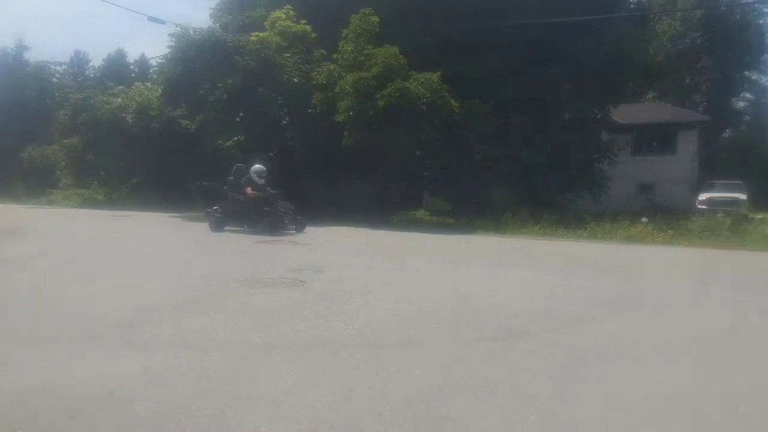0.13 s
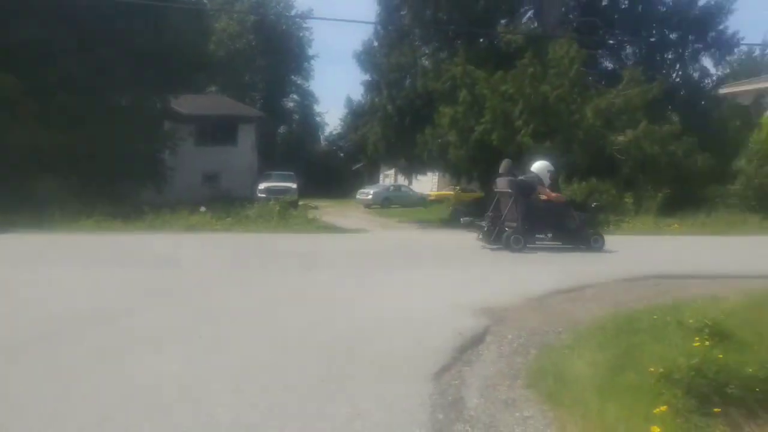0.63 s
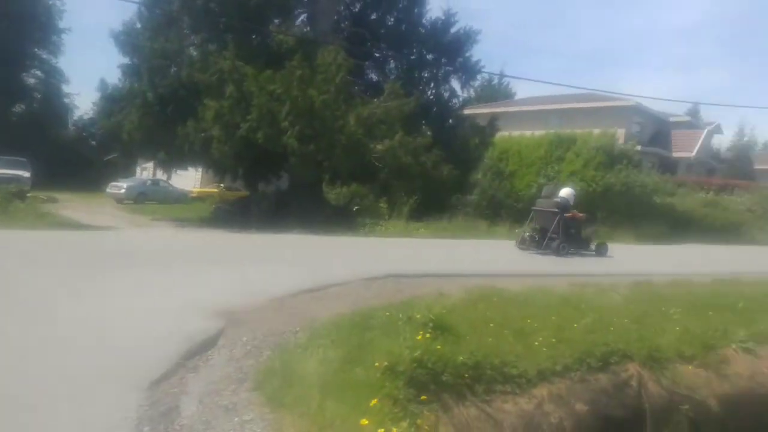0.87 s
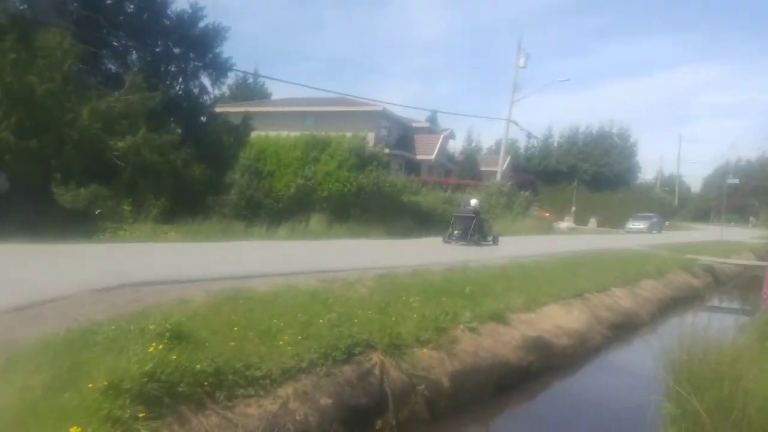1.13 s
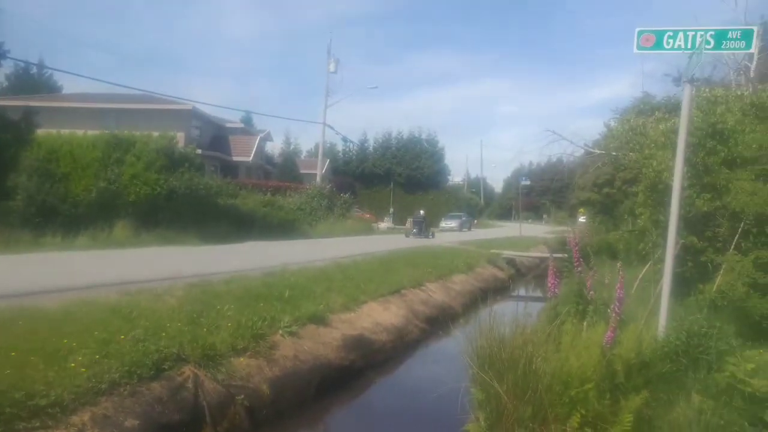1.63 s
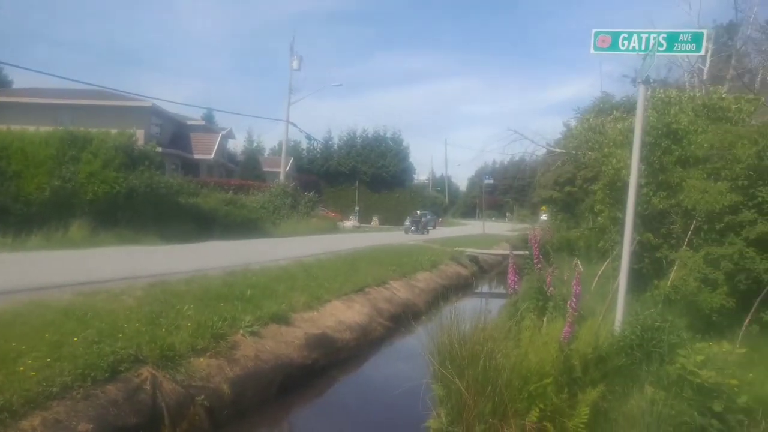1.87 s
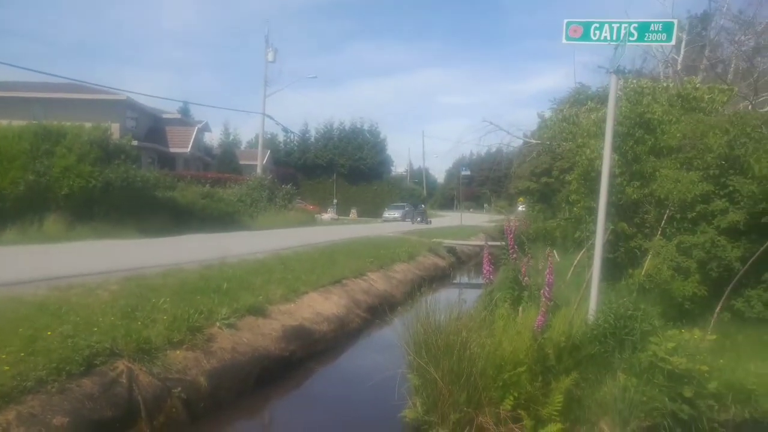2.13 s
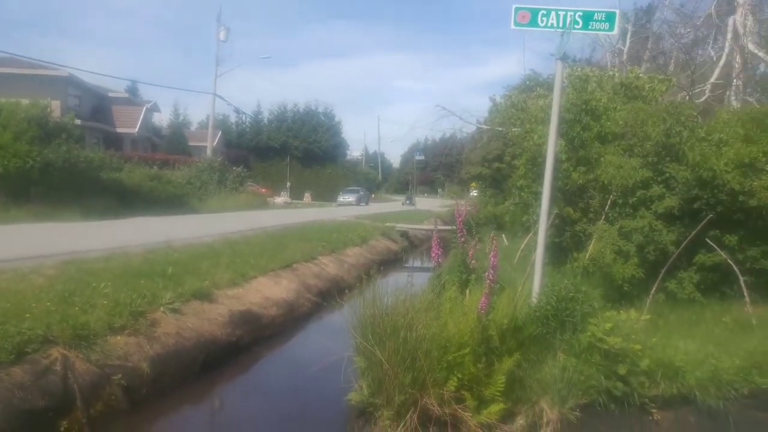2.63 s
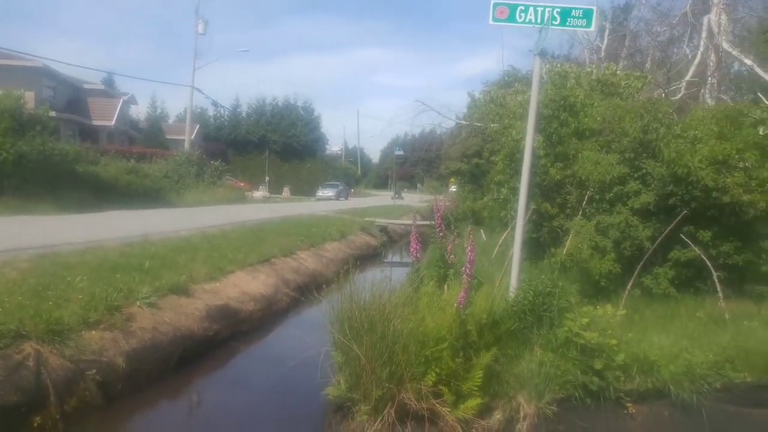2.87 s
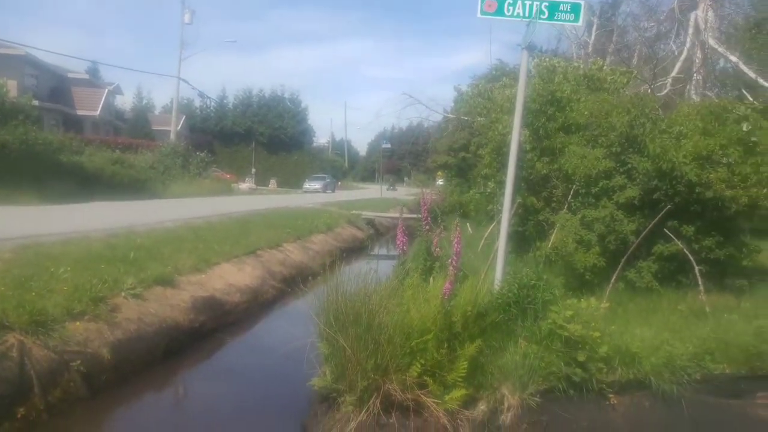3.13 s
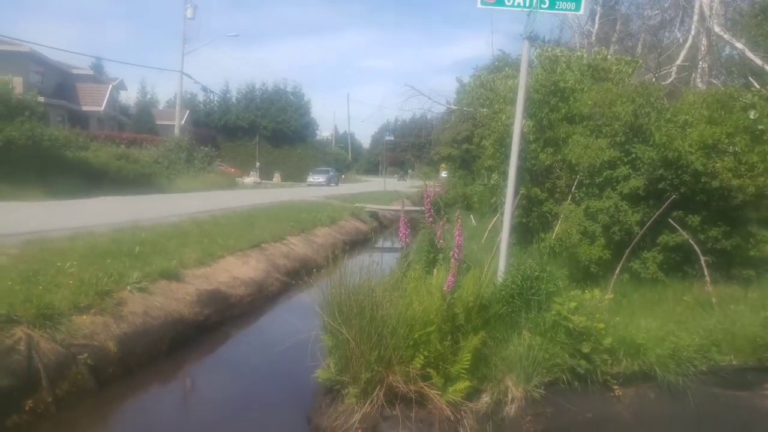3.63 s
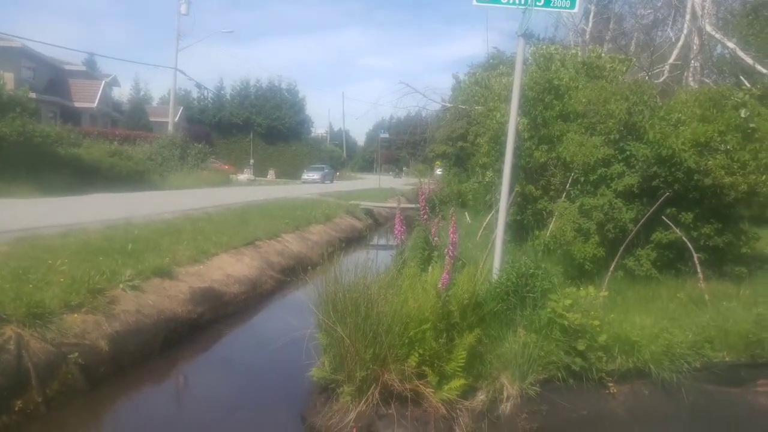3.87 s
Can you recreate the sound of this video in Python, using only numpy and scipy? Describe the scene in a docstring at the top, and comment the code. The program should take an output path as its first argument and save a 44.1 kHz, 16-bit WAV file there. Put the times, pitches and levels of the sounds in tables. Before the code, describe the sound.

A small four-stroke kart passes on an open paved road, its rapid popping exhaust and tyre hiss peaking near one second, then receding with a hollow low putter, heard from a handheld phone at the roadside.

```python
"""A single-cylinder four-stroke kart passes a hand-held phone on a paved road and drives away.
Each firing thumps and snaps in the exhaust pipe and gas cracks; half a cycle later intake and silencer ring.
Echoes return from hedges and houses, tyres and chain hiss across the phone's two microphone ports,
small ticks sound near the phone and light wind rumbles. After a silent start the sound cuts in and fades up."""
import sys
import numpy as np
from scipy import signal
from scipy.fft import rfft, irfft
from scipy.io import wavfile
from scipy.ndimage import uniform_filter1d

SR = 44100
rng = np.random.default_rng(int(sys.argv[2]) if len(sys.argv) > 2 else 0)


def to_wav(sig):
    """Store sig (one row per channel, or 1-D mono) as 16-bit WAV at the path in sys.argv[1].

    Samples outside -1..1 are clipped; the rate is SR.
    """
    pcm = np.clip(np.atleast_2d(sig), -1, 1) * 32767
    pcm = np.round(pcm).astype(np.int16)
    wavfile.write(sys.argv[1], SR, pcm.T)  # frames by channels


N = 176400


def undb(db):
    """dB to gain."""
    return 10 ** (np.asarray(db) / 20)


def unit(x):
    """Scales to rms 1."""
    return x / np.sqrt(np.mean(x ** 2))


def curve(table, index):
    """One column of a table, interpolated over time."""
    a = np.array(table)
    return np.interp(np.arange(N) / SR, a[:, 0], a[:, index])


def at(table, hz):
    """A spectrum read on a log-frequency axis."""
    a = np.array(table)
    return np.interp(np.log(hz + 1), np.log(a[:, 0]), a[:, 1])


def band(x, lo_hz, hi_hz):
    """Band-pass."""
    return signal.sosfilt(signal.butter(2, [lo_hz, hi_hz], "band", fs=SR, output="sos"), x)


def ring(x, modes):
    """Decaying resonances struck by x."""
    out = 0
    for hz, db, t60 in modes:
        pole = np.exp((2j * np.pi * hz - np.log(1000) / t60) / SR)
        out = out + undb(db) * signal.lfilter([1], [1, -pole], x).imag
    return out


def steep_ring(x, modes):
    """Each resonance passed twice, so that it swells before it decays and its skirts are steep."""
    return unit(sum(ring(ring(x, [mode]), [mode]) / mode[2] for mode in modes))


def pulses(times, sizes):
    """Clicks at exact times, each shared between two samples."""
    out, s = np.zeros(N + 2), np.clip(times * SR, 0, N)
    np.add.at(out, s.astype(int), sizes * (1 - s % 1))
    np.add.at(out, s.astype(int) + 1, sizes * (s % 1))
    return out[:N]


def fade(x, seconds):
    """Exponential tail after each click, with this time constant."""
    return signal.lfilter([1], [1, -np.exp(-1 / (seconds * SR))], x)


def walk(rate):
    """Random levels held 1 / rate seconds and smoothed twice."""
    k = int(SR / rate)
    steps = np.repeat(rng.standard_normal(N // k + 1), k)
    return 0.76 * uniform_filter1d(uniform_filter1d(steps, k), k)[:N]


def scatter(count):
    """Bounded random deviations, one per cycle."""
    return np.clip(rng.standard_normal(count), -2, 2)


# Engine speed as heard at the phone: time_s, firing_rate_hz
FIRING_RATE = [(0.34, 36.26), (0.6, 35.08), (0.8, 34.02), (1.0, 33.2), (1.3, 32.89), (1.7, 32.73),
               (2.2, 32.92), (2.8, 33.17), (3.4, 33.2), (4.0, 33.46)]
ONE_FIRING_S = 2.1973  # a moment at which the exhaust valve opens


def cycles():
    """Running count of engine cycles, whole at each firing."""
    turns = np.cumsum(curve(FIRING_RATE, index=1)) / SR
    return turns - turns[int(ONE_FIRING_S * SR)]


# Engine parts over the pass: time_s, thump_db, upper_mode_db, snap_db, intake_db, silencer_db,
# gas_crack_db, bright_crack_db
ENGINE_LEVELS = [(.35, -51, -31.5, -36, -25.5, -29, -34.5, -59),
                 (.6, -59, -32.5, -29, -26.5, -33, -44, -52), (.8, -50, -27, -27, -21, -22, -46, -32),
                 (.92, -48, -15.5, -19, -17, -17, -36, -34), (1.05, -28, -17, -29, -18, -23.5, -37, -28),
                 (1.25, -21, -26, -17, -23, -20.5, -26, -25),
                 (1.5, -18, -25, -18, -27.5, -21.5, -25.5, -20),
                 (1.7, -18.5, -26.5, -16.5, -34, -30, -32, -19),
                 (1.9, -19.5, -24.5, -16.5, -32, -29, -23.5, -27.5),
                 (2.15, -19.5, -26.5, -17, -35.5, -30, -31, -30),
                 (2.4, -18.5, -29.5, -18, -37, -34.5, -34, -34), (2.7, -18, -26, -23, -45, -32.5, -49, -33),
                 (3.0, -18.5, -26.5, -29, -33, -31.5, -41, -41),
                 (3.3, -23, -30, -25, -38.5, -44, -42.5, -51),
                 (3.6, -24, -31.5, -25.5, -35.5, -31.5, -39, -36.5),
                 (4.0, -28.5, -34, -28, -31.5, -36, -35, -28)]
JITTER_S, SCATTER_DB = .00006, 1.0  # cycle to cycle


def engine(turns):
    """Strikes all pipes from one train of firings and sets each part's level along the pass."""
    whole = np.arange(np.ceil(turns[0]), turns[-1])
    fired = np.interp(whole, turns, np.arange(N) / SR) + JITTER_S * scatter(len(whole))
    size = undb(SCATTER_DB * scatter(len(whole)))
    push = exhaust_push(fired, size)
    rush = intake_rush(turns)
    parts = [thump(push), upper_mode(push), snap(fired, size),
             intake(turns, whole, rush), silencer(turns, whole, rush)]
    direct = sum(x * undb(curve(ENGINE_LEVELS, index=k + 1)) for k, x in enumerate(parts))
    direct = direct + boom(push)
    return direct + echoes(direct) + gas_crack(fired)


THUMP_LAG_S, VALVE_S = 0.00088, 0.0012


def exhaust_push(fired, size):
    """The opening valve releases a soft pressure pulse just after the snap."""
    return fade(fade(pulses(fired + THUMP_LAG_S, size), VALVE_S / 2), VALVE_S / 2)


# Low exhaust pipe modes: pitch_hz, level_db, t60_s
THUMP_MODES = [(107, -10.5, 0.022), (138.4, -6.5, 0.051), (178.6, -3.5, 0.073)]
WAVER_DB = 4.5  # scales the random swell of each pipe mode on its way through moving air


def thump(push):
    """Low pipe modes ring against the snap's polarity, each wavering alone."""
    return -unit(sum(ring(push, [mode]) * undb(WAVER_DB * walk(3.07)) for mode in THUMP_MODES))


# Upper exhaust pipe mode: pitch_hz, level_db, t60_s
UPPER_MODE = [(221.4, 0, 0.026)]


def upper_mode(push):
    """A higher pipe mode rings and wavers faster."""
    return -unit(ring(push, UPPER_MODE)) * undb(WAVER_DB * walk(4.6))


# Sharp exhaust resonances: pitch_hz, level_db, t60_s (level and t60 of one of two passes)
SNAP_MODES = [(591.6, 5, 0.0076), (1310, -8, 0.016)]


def snap(fired, size):
    """Each firing strikes short resonances with a click."""
    return steep_ring(pulses(fired, size * undb(SCATTER_DB * scatter(len(fired)))), SNAP_MODES)


INTAKE_AT, INTAKE_OPEN = .52, 0.29  # shares of the cycle
RUSH_DB = -9  # rushing air against the struck ring


def intake_rush(turns):
    """Noise of air drawn in while the intake is open."""
    opening = np.clip((turns - INTAKE_AT) % 1 / INTAKE_OPEN, 0, 1)
    return np.sin(np.pi * opening) * rng.standard_normal(N)


def later_pulses(turns, whole, share):
    """One click per cycle, a share of the cycle after the firing."""
    times = np.interp(whole + share, turns, np.arange(N) / SR)
    return pulses(times + .00008 * scatter(len(whole)), undb(1.0 * scatter(len(whole))))


# Intake resonances: pitch_hz, level_db, t60_s (level and t60 of one pass; the click passes twice)
INTAKE_MODES = [(516.5, 0, 0.054), (969, -3.5, 0.032), (1412, -8.5, 0.043)]
APPROACH_RAISE = 1.08  # pitch ratio while the kart draws near
PASSED_HZ, NEARING_HZ = 33, 36.3  # heard firing rates


def intake(turns, whole, rush):
    """Suction rings the intake, higher while the kart draws near, and air rushes through it."""
    suck = later_pulses(turns, whole, INTAKE_AT)
    near = np.clip((curve(FIRING_RATE, index=1) - PASSED_HZ) / (NEARING_HZ - PASSED_HZ), 0, 1)
    raised = [(hz * APPROACH_RAISE, db, t60) for hz, db, t60 in INTAKE_MODES]
    struck = np.sqrt(1 - near) * steep_ring(suck, INTAKE_MODES) + np.sqrt(near) * steep_ring(suck, raised)
    return struck + undb(RUSH_DB) * unit(ring(rush, INTAKE_MODES))


# Silencer resonances: pitch_hz, level_db, t60_s (level and t60 of one pass; the click passes twice)
SILENCER_MODES = [(627.7, -1.5, 0.045), (466, -6.5, 0.055)]
SILENCER_AT = .55  # share of the cycle


def silencer(turns, whole, rush):
    """The silencer rings just after the intake, with the same rush of air."""
    struck = steep_ring(later_pulses(turns, whole, SILENCER_AT), SILENCER_MODES)
    return struck + undb(RUSH_DB) * unit(ring(rush, SILENCER_MODES))


# Lowest pipe mode over the pass: time_s, level_db
BOOM_LEVELS = [(.35, -43), (.7, -31), (.92, -23), (1.2, -24.5), (1.6, -31.5), (2.0, -43), (2.35, -18),
               (2.7, -48), (3.2, -29), (3.6, -35), (4.0, -28)]
# Its resonance: pitch_hz, level_db, t60_s (level and t60 of one of two passes)
LOWEST_MODE = [(62, 0, 0.038)]


def boom(push):
    """The exhaust push swings the lowest pipe mode, which wavers less."""
    return steep_ring(push, LOWEST_MODE) * undb(curve(BOOM_LEVELS, index=1) + WAVER_DB / 2 * walk(3.14))


# Gas crack spectrum: pitch_hz, density_db (per Hz)
CRACK_SPECTRUM = [(600, -16), (900, 10), (1420, 13.5), (2000, -0.5), (2930, 3.5), (4500, -28)]
# Spectrum of its bright part: pitch_hz, density_db (per Hz)
BRIGHT_SPECTRUM = [(2500, -45), (3700, 1), (5000, 6), (6200, 2.5), (7700, -13.5), (8950, -30), (10500, -22),
                   (15600, -41)]
CRACK_S, CRACK_SCATTER_DB = 0.00067, 2.3


def gas_crack(fired):
    """Turbulent gas bursts out once a cycle, in a main and a bright part."""
    clicks = pulses(fired + 0.0011, undb(CRACK_SCATTER_DB * scatter(len(fired))))
    puff = fade(fade(clicks, CRACK_S), 0.0012)
    main = unit(puff * air(CRACK_SPECTRUM)) * undb(curve(ENGINE_LEVELS, index=6))
    bright = unit(puff * air(BRIGHT_SPECTRUM)) * undb(curve(ENGINE_LEVELS, index=7))
    return main + bright


ECHO_GAIN, ECHO_T60_S, ECHO_WIDE = undb(-16) / 4, 0.083, 0.13  # ECHO_WIDE: side against mid


def echoes(direct):
    """Hedges and houses return a short, slightly wide, decaying scatter of reflections."""
    t = np.arange(SR // 3) / SR
    noise = band(rng.standard_normal((2, len(t))), 220, 1000)
    mid, side = noise * undb(-60 * t / ECHO_T60_S) * (t > .006)
    walls = np.array([mid + ECHO_WIDE * side, mid - ECHO_WIDE * side]) / np.sqrt(np.sum(mid ** 2))
    return ECHO_GAIN * signal.fftconvolve(direct[None], walls, axes=1)[:, :N]


# Left microphone port against the right: pitch_hz, difference_db
LEFT_LOUDER = [(60, -1.5), (700, 1), (1290, 1), (2380, 1), (4400, 2.5), (8120, 6), (11000, 7.5),
               (13500, -6.5), (15000, -4)]
ALIKE_HZ = 1200  # well below this both ports hear nearly the same


def air(spectrum):
    """Stereo noise: alike in the bass, unrelated in the treble, with a level difference between ports."""
    hz = np.arange(N // 2 + 1) * SR / N
    alike = 1 / (1 + (hz / ALIKE_HZ) ** 2)
    mid, side = rfft(rng.standard_normal((2, N)))
    sign = np.array([[1], [-1]])  # left, right
    both = mid * np.sqrt(1 + alike) + sign * side * np.sqrt(1 - alike)
    return unit(irfft(both * undb(at(spectrum, hz) + sign * at(LEFT_LOUDER, hz) / 2), N))


# Road hiss spectrum, microphone ports included: pitch_hz, density_db (per Hz)
HISS_SPECTRUM = [(40, -15), (150, -19.5), (330, -19), (560, -12.5), (1050, -20.5), (1290, -28.5),
                 (2070, -22), (3490, -27), (4500, -29.5), (6040, -19.5), (7560, -34), (8400, -41.5),
                 (8950, -60), (9500, -44), (10600, -37), (12500, -46), (15600, -40)]
# Road hiss over the pass: time_s, then level_db under 1.2, 1.2-4.4, 4.4-8.9, 8.9-12.3, over 12.3 kHz
ROAD_LEVELS = [(.35, -23.5, -36, -24.5, -38, -35), (.6, -26, -34.5, -28, -35, -39),
               (.8, -22.5, -33.5, -19.5, -30, -36), (.95, -17, -22, -20, -25.5, -29),
               (1.15, -18, -28, -21, -29, -30), (1.35, -23, -26.5, -25, -38, -33),
               (1.6, -25.5, -28.5, -23, -36.5, -45), (1.9, -25.5, -31.5, -26.5, -38, -48),
               (2.2, -26.5, -32.5, -25, -40.5, -50), (2.5, -28, -32.5, -29.5, -44, -52),
               (2.9, -31.5, -36.5, -29, -49.5, -52), (3.3, -29, -35.5, -30, -51.5, -53),
               (3.7, -32.5, -39.5, -33, -51, -57), (4.0, -32.5, -37, -32, -50.5, -60)]
THROB_DB, FLICKER_DB = 1, 1.8  # once-a-cycle swing; scale of the random flicker


def road(turns):
    """Tyre and chain hiss in five ranges that flicker alone and throb with the engine cycle and crank."""
    noise, out = rfft(air(HISS_SPECTRUM)), 0
    hz = np.arange(N // 2 + 1) * SR / N
    edges = [1, 1200, 4400, 8900, 12300, SR]  # Hz
    above = lambda edge_hz: 1 - 1 / (1 + (hz / edge_hz) ** 12.)
    throb = THROB_DB * np.cos(2 * np.pi * (turns - .1))
    throb = throb + 1.02 * np.cos(4 * np.pi * (turns - .06))  # dB, once per crank turn
    for k in range(len(edges) - 1):
        part = unit(irfft(noise * np.sqrt(above(edges[k]) - above(edges[k + 1])), N))
        flicker = FLICKER_DB * (walk(25) + walk(150))
        out = out + part * undb(curve(ROAD_LEVELS, index=k + 1) + throb + flicker)
    return out


# Small ticks near the phone: start_s, level_db (before the port levels)
TICK_EVENTS = [(1.6177, -27), (1.71, -15), (3.4431, -18), (3.6815, -24)]
TICK_HZ, TICK_S = 11000, 0.0014  # nominal pitch, decay time constant


def ticks():
    """Short bright noise bursts, louder at the left port."""
    a = np.array(TICK_EVENTS)
    burst = fade(pulses(a[:, 0], undb(a[:, 1])), TICK_S)
    hiss = unit(band(rng.standard_normal((2, N)), TICK_HZ * 0.83, TICK_HZ * 1.1))
    return burst * hiss * undb([[-1], [-6]])


WIND_DB, WIND_GUST_DB = -38, 5  # middle level, scale of the random gusts


def wind():
    """Light gusts swell together as low rumble that is unrelated between the ports."""
    rumble = unit(band(rng.standard_normal((2, N)), 23, 153))
    return rumble * undb(WIND_DB + WIND_GUST_DB * walk(3.8))


def scene():
    """Kart, road, ticks and wind at the phone."""
    turns = cycles()
    return engine(turns) + road(turns) + ticks() + wind()


def top_cut(x):
    """Nothing passes above the cut-off."""
    return signal.sosfilt(signal.butter(12, 15750, fs=SR, output="sos"), x)


START_S, START_DB, FADE_S = .3445, -13.5, 0.15  # cut-in time, gain there, fade length


def record(dry):
    """The phone's silent start and fade up, low cut and rounded peaks."""
    t = np.arange(N) / SR
    fade_left = np.clip(1 - (t - START_S) / FADE_S, 0, 1)
    gain = (t > START_S) * undb(START_DB * fade_left ** 1.65)
    low_cut = signal.sosfilt(signal.butter(4, 48, "high", fs=SR, output="sos"), dry)
    mix = np.tanh(0.8 * low_cut * gain) / 0.84
    return top_cut(mix)


dry = scene()
out = record(dry)
to_wav(out)
```